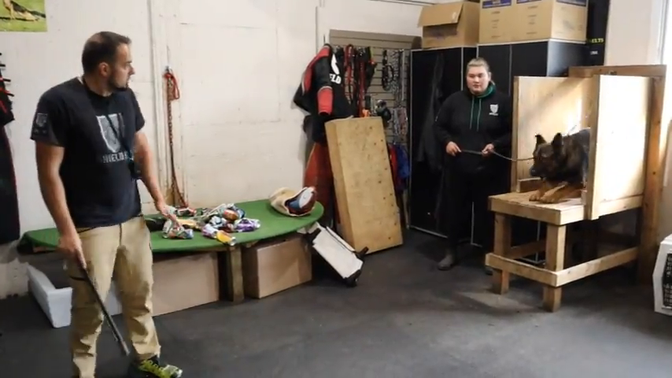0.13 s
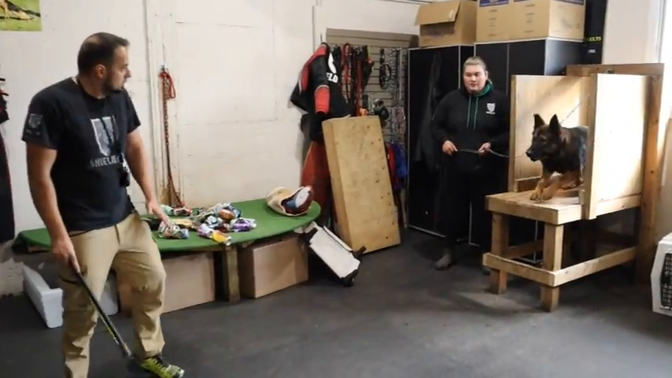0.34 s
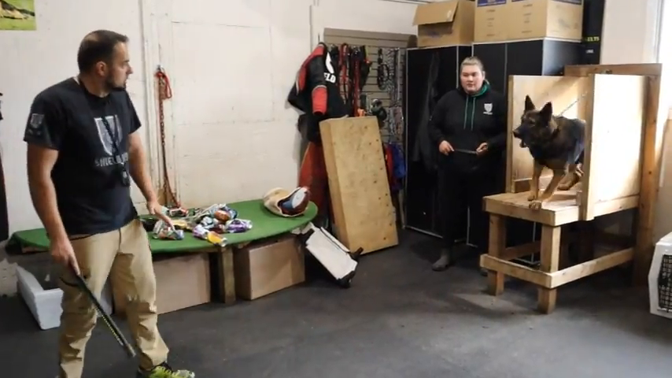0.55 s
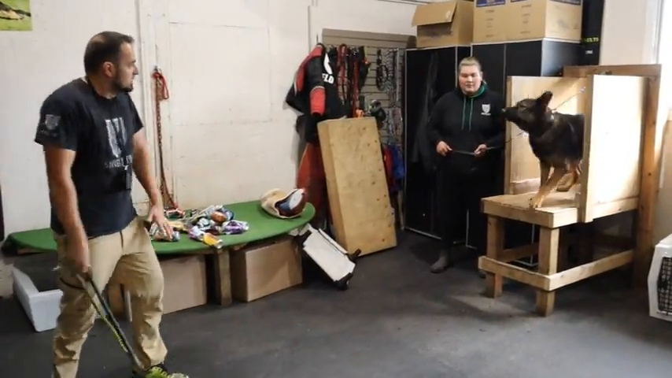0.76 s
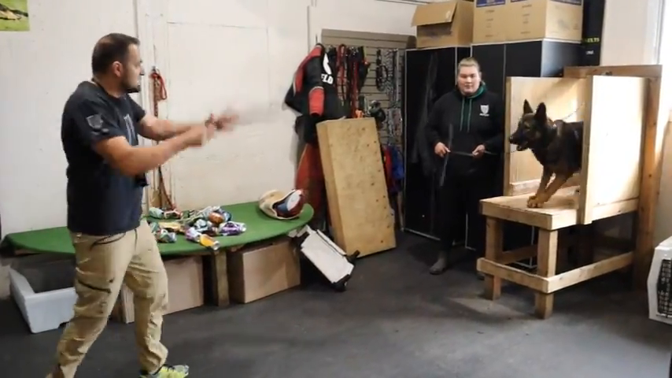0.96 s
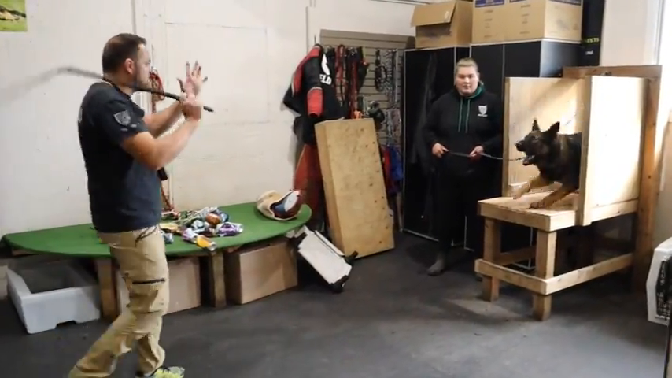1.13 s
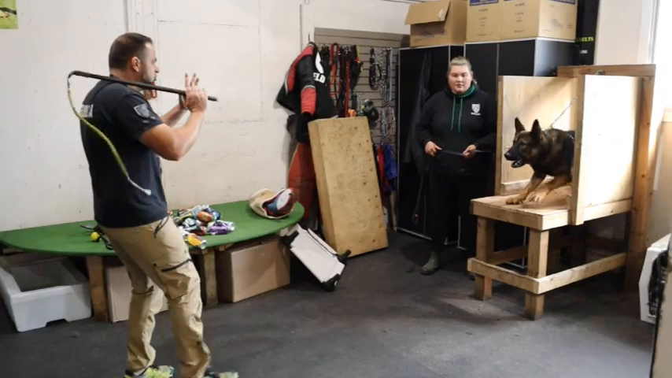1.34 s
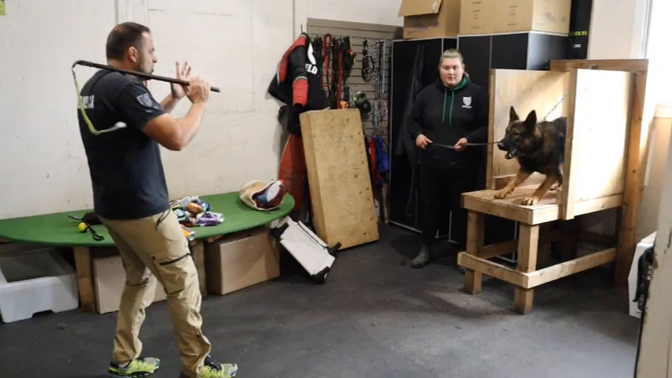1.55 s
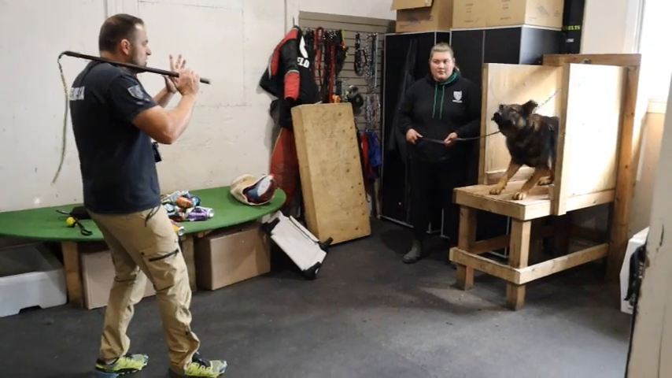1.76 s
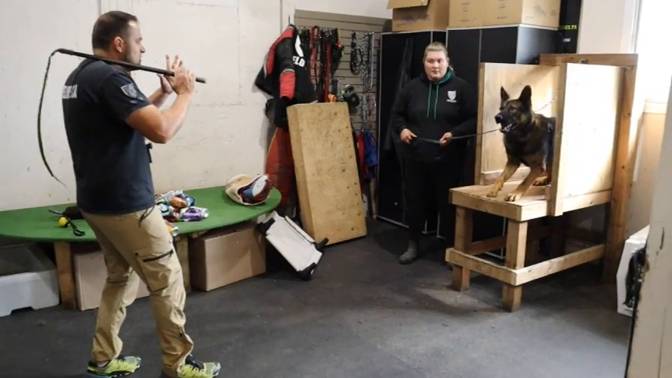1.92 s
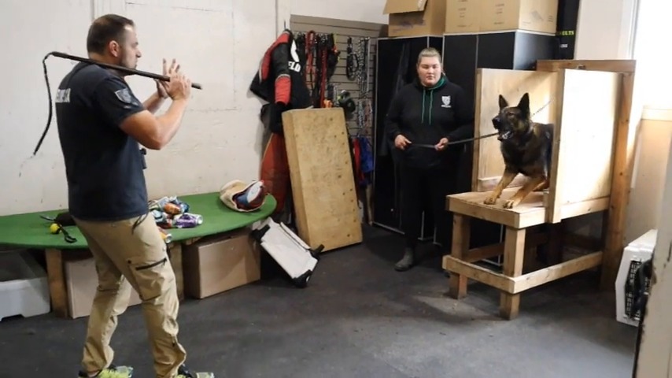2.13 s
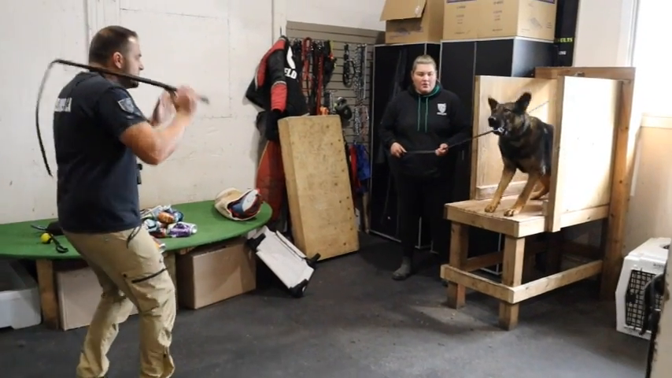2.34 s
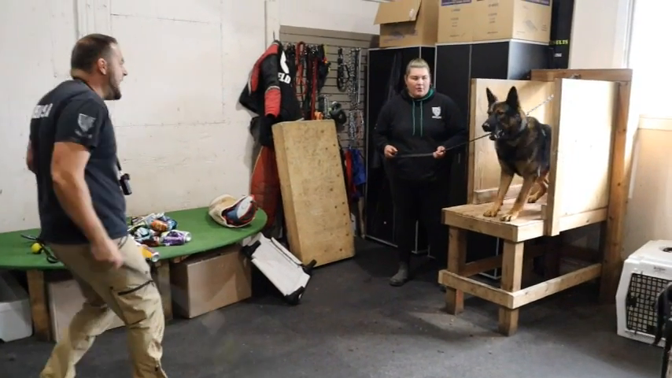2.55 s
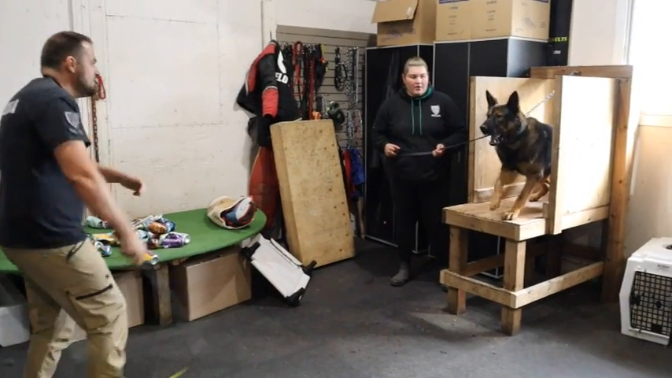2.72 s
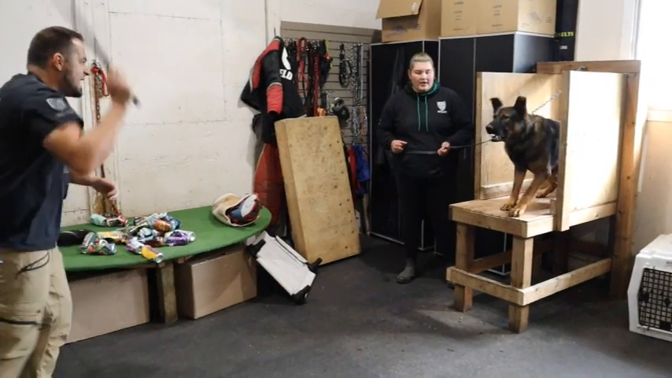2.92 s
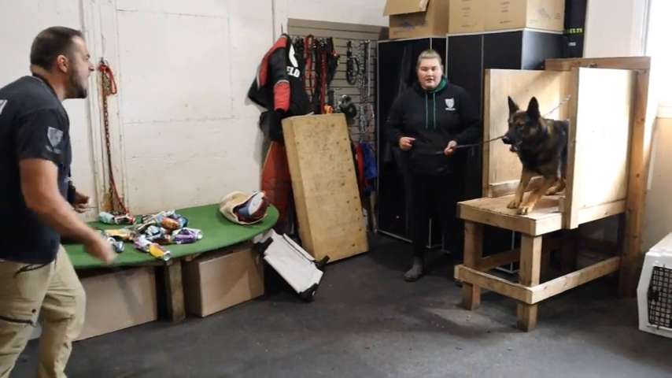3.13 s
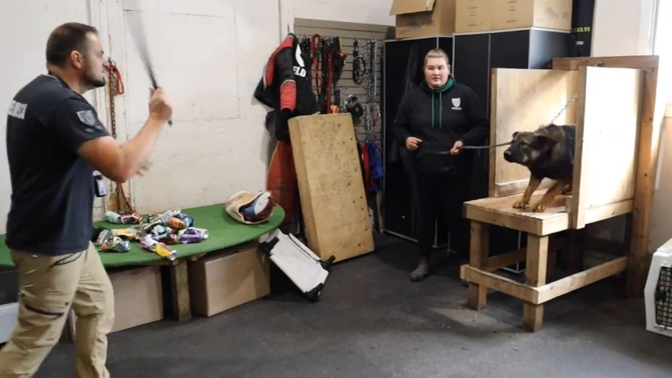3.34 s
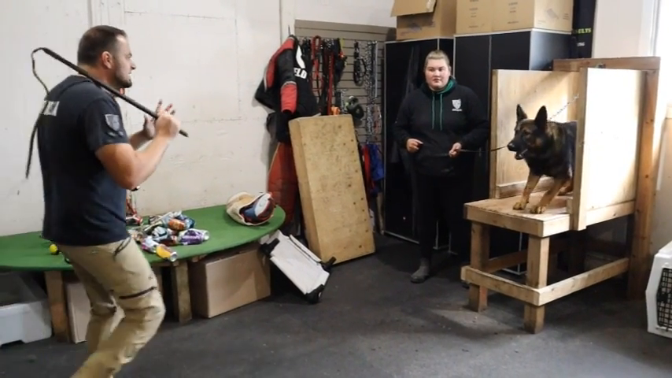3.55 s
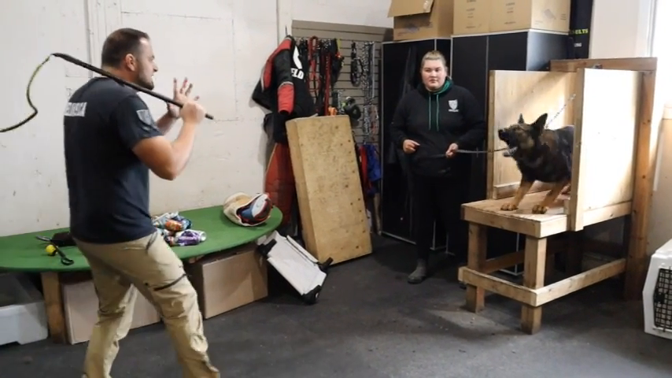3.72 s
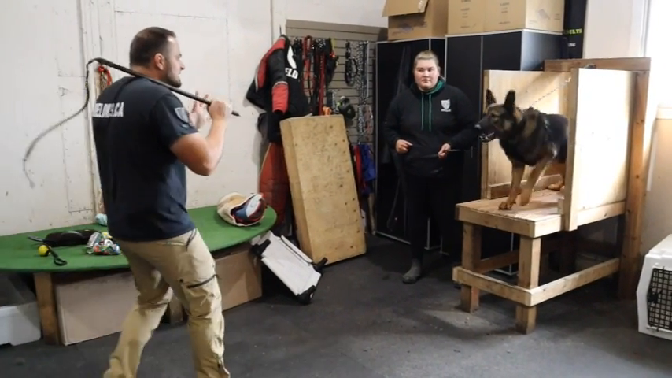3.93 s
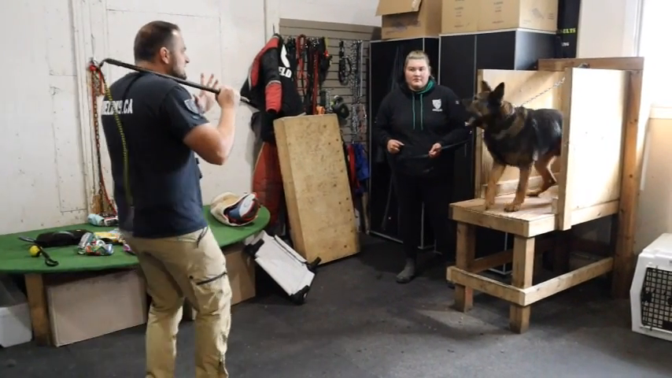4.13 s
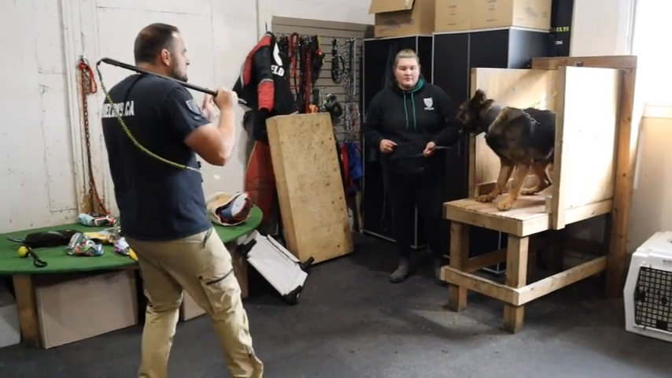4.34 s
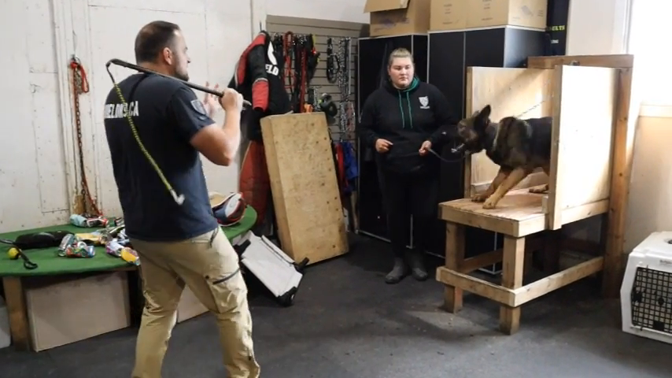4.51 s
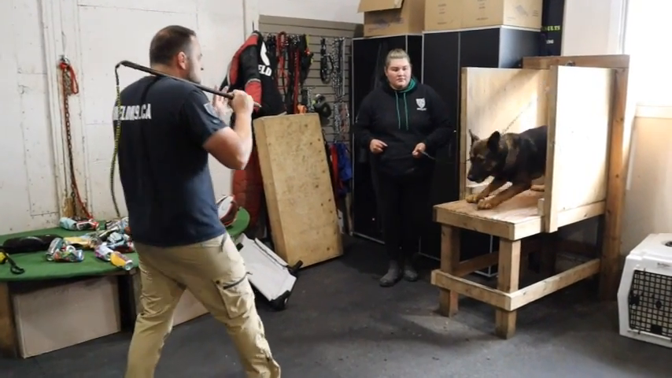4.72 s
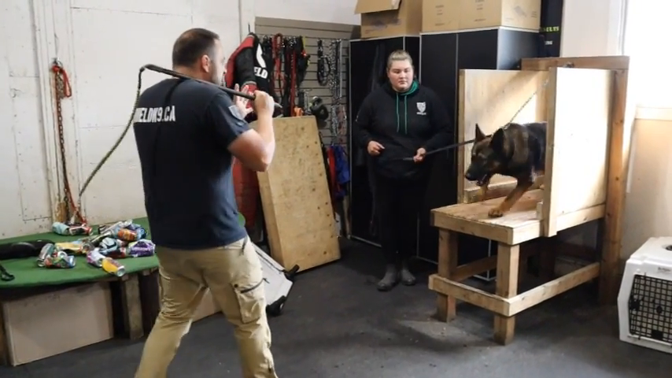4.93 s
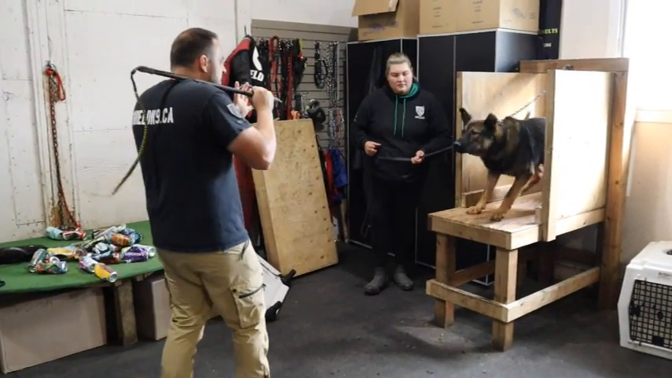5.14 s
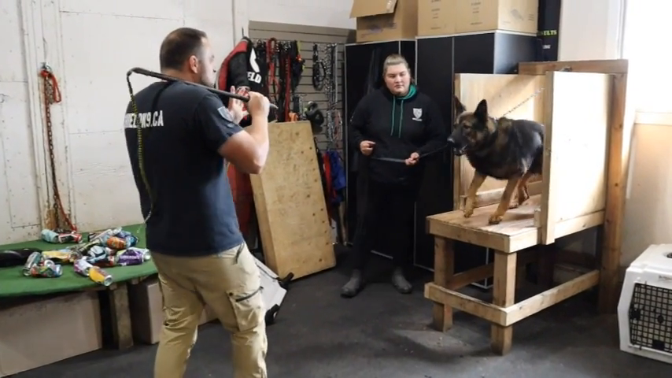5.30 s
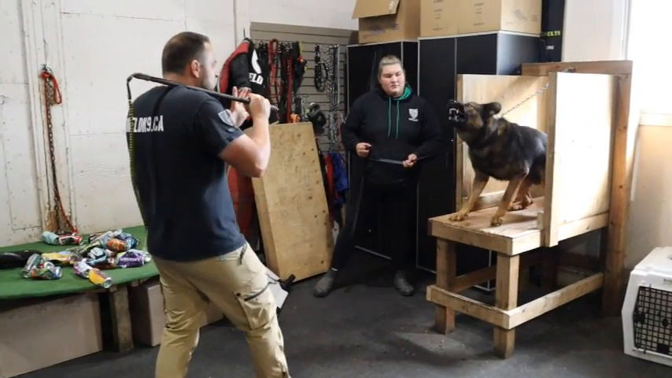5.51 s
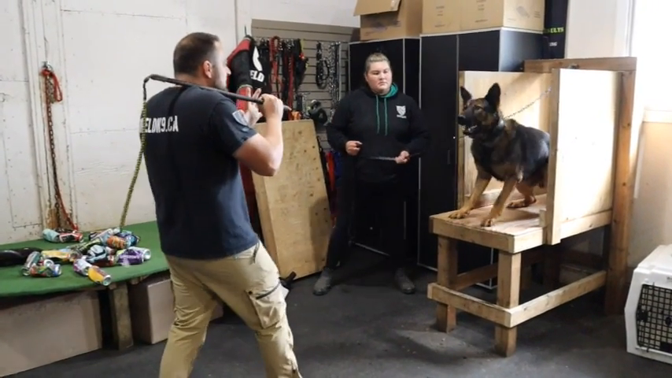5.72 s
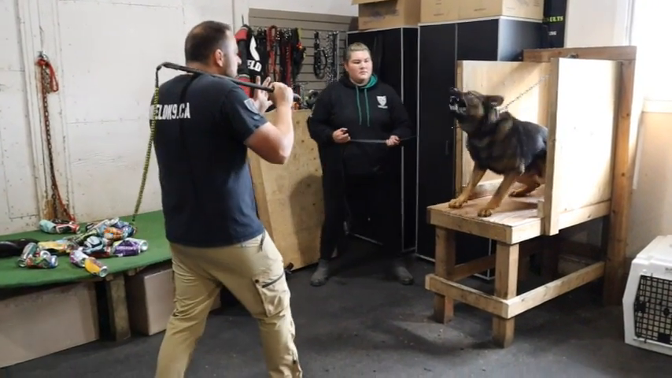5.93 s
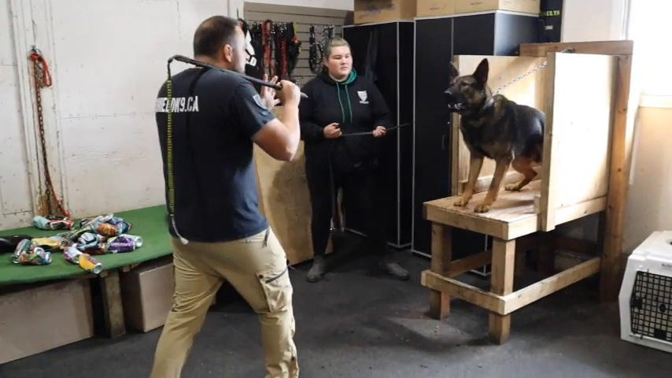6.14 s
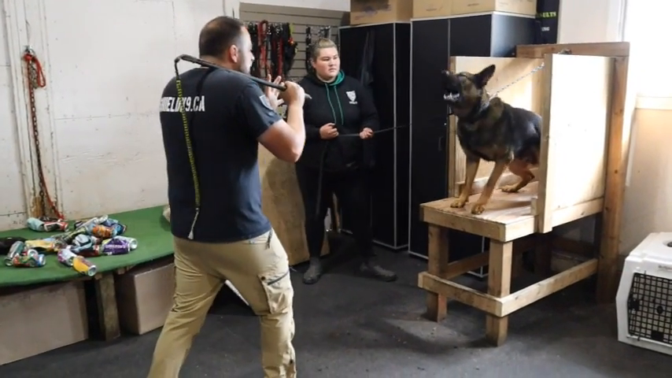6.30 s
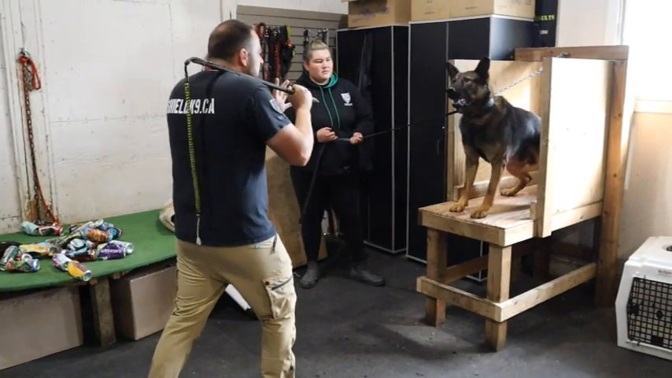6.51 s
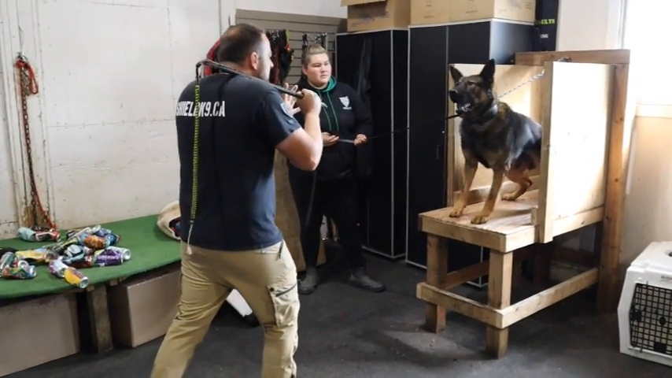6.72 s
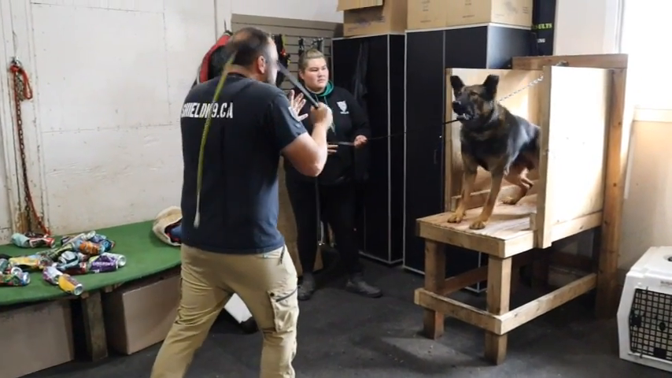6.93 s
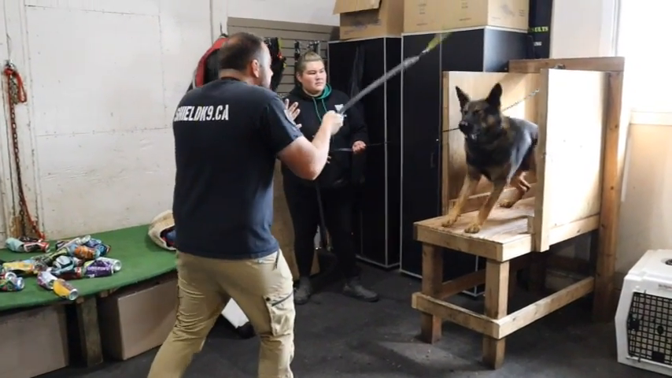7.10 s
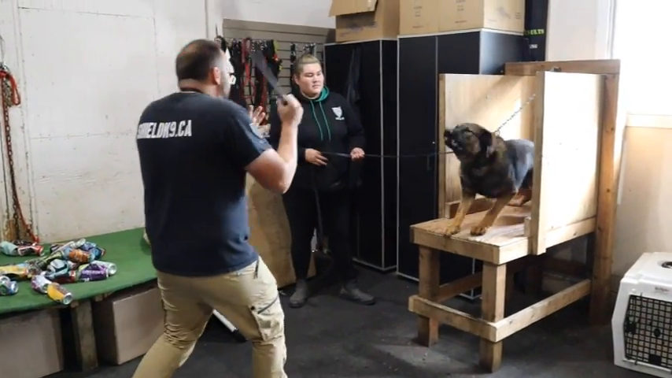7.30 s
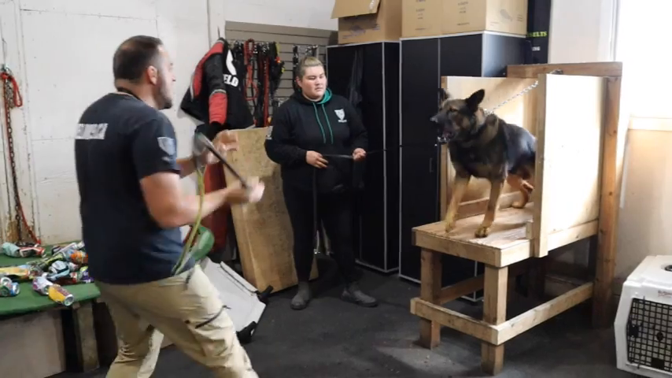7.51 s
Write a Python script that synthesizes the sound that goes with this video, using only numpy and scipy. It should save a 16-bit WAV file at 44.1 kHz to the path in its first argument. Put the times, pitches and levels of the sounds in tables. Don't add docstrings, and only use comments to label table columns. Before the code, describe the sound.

A large dog barks loudly about twice a second in a hard, echoing room, with fainter yelps and one sharp whip crack close by.

```python
import sys
import numpy as np
from scipy import signal
from scipy.fft import rfft, irfft
from scipy.io import wavfile
from scipy.ndimage import uniform_filter1d

SR = 44100
rng = np.random.default_rng(int(sys.argv[2]) if len(sys.argv) > 2 else 0)


def volts(x):
    e = np.asarray(x, float) / 20
    return 10 ** e


def dump(signal):
    limited = np.clip(np.atleast_2d(signal).T, -1, 1)
    pcm = np.round(limited * 32767).astype(np.int16)
    wavfile.write(sys.argv[1], SR, pcm)


N = 337806

# frequency_hz, level_db
BARK_THROAT = [(60, -75.5), (220, -26), (350, -19.5), (500, -9.5), (600, 3.5), (700, -2), (850, -3.5),
               (1020, 2), (1300, -9), (1550, -8.5), (2000, -18.5), (2400, -29), (4000, -54), (8000, -70)]
# frequency_hz, level_db
BREATH_SPECTRUM = [(1800, -37.5), (2600, 1), (4000, 0), (6500, -7), (9000, -20), (12000, -24), (15000, -41)]


def read(points, hz):
    f, value = np.transpose(points)
    return np.interp(np.log(hz + 1), np.log(f + 1), value)


def evened(x):
    return x / np.sqrt(np.mean(x ** 2) + 1e-20)


def colour(x, points):
    size = x.shape[-1]
    gain = volts(read(points, np.fft.rfftfreq(size, 1 / SR)))
    return irfft(rfft(x) * gain, size)


def hiss(size, points):
    return evened(colour(rng.standard_normal(size + 2048), points)[:size])


def wander(size, span):
    span = max(int(span), 2)
    smooth = uniform_filter1d(rng.standard_normal(size), span)
    return evened(uniform_filter1d(smooth, span))


def add(mix, s, sound):
    at = round(s * SR)
    sound = sound[max(-at, 0):]
    part = mix[max(at, 0):][:len(sound)]
    part += sound[:len(part)]


def balance(db):
    return volts(db * np.array([[.5], [-.5]]))


def ports(x, lag):
    return np.array([np.pad(x, (lag, 0))[:N], x])


def room(x, build):
    # frequency_hz, t60_s
    decay = [(100, 0.97), (400, 1), (1000, 1), (2000, 0.92), (4000, 0.47), (10000, 0.63)]
    # frequency_hz, level_db
    spread = [(30, -20), (125, -5), (300, -9), (600, -8), (1000, -3), (2000, 2), (4000, 4), (8000, 8),
              (13000, 4)]
    taps = rng.standard_normal((2, SR)) * (rng.random((2, SR)) < .5)
    hz, t, z = signal.stft(taps, SR, nperseg=256)
    fade = volts(-60 * t / read(decay, hz)[:, None])
    tail = signal.istft(z * fade, SR, nperseg=256)[1][:, :SR]
    tail = tail * (1 - np.exp(-(np.arange(SR) / SR / build) ** 2))
    tail = tail / np.linalg.norm(tail[0])
    mid, side = signal.fftconvolve(x[None], tail, axes=1)[:, :N]
    side = colour(side, spread)
    return np.array([mid + side, mid - side])


def hum():
    # frequency_hz, level_db
    ambience = [(30, -21), (120, -15.5), (300, 6), (1000, 3.5), (3000, -3), (8000, -18.5), (15000, -43.5)]
    return volts(-52.0) * np.array([hiss(N, ambience), hiss(N, ambience)])


def earlier_bark():
    size = SR // 2
    return volts(-18 - 70 * np.arange(size) / SR) * hiss(size, BARK_THROAT)


def swells(rows, spectrum):
    out = np.zeros(N)
    for s, length, db in rows:
        size = round(length * SR)
        level = volts(db + 2.5 * wander(size, 300)) * np.hanning(size)
        add(out, s, level * hiss(size, spectrum))
    return out


def scuffs():
    # start_s, scrape_db, length_s, thud_db
    contacts = [(0.13, -32, 0.033, -43.5), (0.36, -49, 0.02, -42), (0.413, -47, 0.011, -52),
                (0.904, -29.5, 0.041, -56.5), (1.029, -49, 0.021, -56), (1.142, -30, 0.08, -46),
                (1.36, -50, 0.02, -45), (1.48, -26.5, 0.04, -51.5), (1.599, -54, 0.02, -53.5),
                (1.99, -60, 0.02, -52), (2.53, -47, 0.034, -51.5), (2.62, -50, 0.03, -56),
                (2.696, -34, 0.02, -61.5), (3.708, -36.5, 0.032, -59.5), (4.204, -38, 0.04, -50),
                (4.744, -28, 0.051, -49), (4.884, -29, 0.034, -47.5), (4.982, -32, 0.071, -63),
                (6.212, -40, 0.059, -45.5), (5.85, -60, 0.02, -52), (7.578, -25.5, 0.17, -63)]
    # frequency_hz, level_db
    scrape_spectrum = [(300, -20.5), (1500, 6.5), (3000, 4), (6000, 0), (10000, -23.5), (14000, -24)]
    # frequency_hz, level_db
    thud_spectrum = [(25, -35.5), (70, -10.5), (120, 5), (180, 4), (260, 4.5), (400, -45.5)]
    # start_s, length_s, level_db
    gasps = [
        (2.56, .26, -41),
        (6.16, .16, -43),
        (6.67, .16, -46),
    ]
    # frequency_hz, level_db
    gasp_spectrum = [(100, -40), (300, -8), (1500, 0), (3000, 0), (4500, -4), (6000, -18), (12000, -40)]
    # start_s, length_s, level_db
    swishes = [
        (1.11, .1, -35),
        (7.15, .2, -40),
    ]
    out, t = np.zeros(N), np.arange(14000) / SR
    for s, db, length, thud_db in contacts:
        fade = volts(db - 26 * t / max(length, .003))
        add(out, s, fade * hiss(len(t), scrape_spectrum) * (1 - np.exp(-t / (.25 * length))))
        add(out, s, volts(thud_db - 140 * t) * hiss(len(t), thud_spectrum) * (1 - np.exp(-t / .0085)))
    return out + swells(gasps, gasp_spectrum) + swells(swishes, scrape_spectrum)


def whip():
    # start_s, level_db, sign, half_period_ms
    ticks = [
        (3.1375, -23, 1, .085),
        (3.1418, -24, -1, .045),
        (3.1445, -11, 1, .08),
        (3.1528, -9, -1, .05),
        (3.153, -13, -1, .35),
        (3.156, -11, 1, .085),
        (3.1745, -11, 1, .12),
        (3.204, -14, -1, .1),
    ]
    # frequency_hz, level_db
    echo_spectrum = [(60, -29), (200, -14.5), (500, -10.5), (1200, -2), (3000, -1.5), (6000, -4.5),
                     (9000, -18), (13000, -24.5), (15500, -34.5)]
    push_s, push_db, push_ms = 3.1447, .5, .57
    out, ms = np.zeros(N), np.arange(1500) / SR * 1000
    for s, db, sign, half in ticks:
        add(out, s, sign * volts(db) * np.cos(np.pi * ms / half) * np.exp(-ms / (2.9 * half)))
    u = ms / push_ms
    add(out, push_s, -volts(push_db) * np.sin(.63 * u) * np.exp(-.45 * u))
    shock = np.zeros(N)
    add(shock, push_s, np.ones(1))
    shock = evened(colour(shock, echo_spectrum)) / np.sqrt(N)
    return ports(out, 1) + volts(11) * balance(2.5) * room(shock, build=.014)


def voice(hz, rough, throat, jitter, shimmer_db):
    size, rough = len(hz), np.clip(rough, 0, 1)
    hz = hz * (1 + jitter * wander(size, 160))
    turns = np.cumsum(hz) / SR
    k = np.arange(1, 16)[:, None]
    lags = rng.random((15, 1))
    harmonics = volts(read(throat, k * hz)) * np.cos(2 * np.pi * (k * turns + lags))
    folds = evened(harmonics.sum(0)) * volts(shimmer_db * wander(size, 190))
    puffs = (.4 + np.exp(-(turns % 1) / .3)) * rng.standard_normal(size)
    return np.sqrt(1 - rough ** 2) * evened(folds) + rough * evened(colour(puffs, throat))


def glide(start, length, first_hz, last_hz, db):
    loudest = .5
    u = np.array([0, loudest, loudest + .25, 1])
    hz = first_hz + (last_hz - first_hz) * np.array([.015, .93, .95, .97])
    effort_db = db - 3.5 * np.array([.82, .013, .38, 1])
    return np.transpose([start + length * u, hz, effort_db])


def yelp(rows, rough, muffle_db, tract):
    s, hz, effort_db = np.transpose(rows)
    t = np.arange(s[0], s[-1], 1 / SR)
    throat = [(f, db - muffle_db * np.log2(f / 430)) for f, db in tract]
    sound = voice(np.interp(t, s, hz), rough, throat, jitter=.012, shimmer_db=3.)
    sound = sound + volts(-25.0 - muffle_db) * hiss(len(t), BREATH_SPECTRUM)
    return s[0], volts(np.interp(t, s, effort_db)) * sound * signal.windows.tukey(len(t), .3)


def second_dog():
    # time_s, pitch_hz, effort_db
    cry = [
        (.16, 269.3, -23.5),
        (.19, 326, -12.5),
        (.225, 415.3, -10.5),
        (.262, 475.6, -12.5),
        (.31, 430.3, -14.5),
        (.39, 337.3, -21),
    ]
    # start_s, length_s, first_hz, last_hz, effort_db
    yelps = [(.51, .17, 350.5, 426.2, -18.5), (2.52, 0.48, 380, 450, -27), (3.97, 0.1, 381, 380.5, -30.5),
             (4.43, 0.09, 457.5, 446.5, -31.5), (4.92, .1, 329.6, 299.3, -25),
             (6.15, 0.14, 419.7, 433, -26), (6.66, .15, 415.5, 444, -30), (7.52, .07, 393, 391.7, -23.5),
             (7.58, .2, 440, 490, -17)]
    # start_s, length_s, first_hz, last_hz, effort_db
    whines = [
        (.78, 0.098, 568, 554, -24.5),
        (4.21, 0.089, 414, 426, -27),
        (4.78, 0.13, 430.6, 467, -29),
        (5.24, 0.22, 441, 416, -37),
        (6.36, .14, 410, 421, -26.5),
    ]
    # frequency_hz, level_db
    cry_throat = [(60, -73), (300, -19), (480, -12), (620, 4.5), (950, -3), (1400, -7), (1800, -16),
                  (2300, -24.5), (2900, -40), (6000, -58.5)]
    # frequency_hz, level_db
    yelp_throat = [(60, -70), (250, -26), (430, -7), (650, -5), (900, 0), (1300, -8), (1750, -14),
                   (2200, -24), (2700, -42), (6000, -58)]
    out = np.zeros(N)
    add(out, *yelp(cry, rough=.36, muffle_db=0, tract=cry_throat))
    for row in yelps:
        add(out, *yelp(glide(*row), rough=.42, muffle_db=1.5, tract=yelp_throat))
    for row in whines:
        add(out, *yelp(glide(*row), rough=.35, muffle_db=8, tract=yelp_throat))
    return out


def bark(start, length, peak_db, high_hz, after):
    # frequency_hz, level_db
    opening = [(350, 0), (700, 0), (1050, -6.5), (1400, 1.5), (1750, 7.5), (2100, 6.5), (2600, -2.5)]
    # frequency_hz, level_db
    boards = [(20, -10.5), (60, -3.5), (120, 10.5), (200, 5), (300, -25.5)]
    # time_s, jolt_db (re effort)
    brace = [
        (0, -52.5),
        (1.2, -42),
        (2.2, -60.5),
        (2.8, -56),
        (3.3, -33),
        (3.8, -29),
        (5.3, -36),
        (7.3, -33.5),
    ]
    attack_s, peak_s, release_s, low_hz = .038, .091, .053, 343
    t = np.arange(0, length, 1 / SR)
    times = [0, attack_s, peak_s, max(length - release_s, peak_s), length]
    effort_db = peak_db + np.interp(t, times, [-22.5, -4, 0, -5.5, -17])
    tilt_db = .5 * (peak_db + 9)
    throat = [(f, db + tilt_db * np.log2(f / 1000)) for f, db in BARK_THROAT]

    wide = (1 + np.tanh((t - after) / .011)) / 2
    hz = low_hz + (high_hz - low_hz) * wide
    hz = hz * (1 - .05 * np.exp((t - length) / .03))
    arch = np.sin(np.pi * np.clip((t - after) / (length - after), 0, 1))
    hz = hz * (1 + .025 * wide * (arch - .8))

    sound = voice(hz, rough=.5, throat=throat, jitter=.02, shimmer_db=3.)
    sound = wide * sound + (1 - wide) * colour(sound, opening)
    rasp_db = -25.5 - .5 * (2.5 - wide) + 1.9 * wander(len(t), 110)
    rasp = volts(rasp_db) * hiss(len(t), BREATH_SPECTRUM)
    shape = volts(effort_db) * signal.windows.tukey(len(t), .2)
    jolt_db = np.interp(start, *np.transpose(brace)) + 120 * (t - peak_s)
    return start, shape * (sound + rasp), shape * volts(jolt_db) * hiss(len(t), boards)


def barking_dog():
    # start_s, length_s, effort_db, high_register_hz, break_after_s
    barks = [(-.085, 0.2, -11.5, 455.2, .05), (.685, 0.15, -8.5, 494.4, 0.043),
             (1.178, .175, -9.5, 515, 0.053), (1.7, .155, -9.5, 510.2, 0.074),
             (2.243, 0.153, -8.5, 506.5, 0.058), (2.77, 0.18, -10, 506.7, .08),
             (3.285, 0.16, -10.5, 488.6, 0.058), (3.75, 0.17, -10.5, 514.4, 0.068),
             (4.225, 0.15, -13.5, 449.2, 0.061), (4.53, 0.16, -11, 500.6, 0.059),
             (5.026, 0.1596, -7.5, 520.5, .06), (5.493, .155, -9, 509.6, 0.052),
             (5.927, .15, -7.5, 548.7, .064), (6.32, 0.17, -9.5, 529.5, 0.066),
             (6.81, .15, -7.5, 540, 0.062), (7.263, .165, -8.3, 529.3, .054)]
    near, other, stand = np.zeros((3, N))
    for k, row in enumerate(barks):
        s, sound, jolt = bark(*row)
        add((near, other)[k % 2], s, sound)
        add(stand, s, jolt)
    return near, other, stand


def scene():
    # time_s, left_over_right_db
    turn = [
        (0, -1),
        (2.8, -1.5),
        (3.3, 2),
        (4.8, 0),
        (5.2, 0),
        (7.6, -1.5),
    ]
    claws, far = scuffs(), second_dog()
    near, other, stand = barking_dog()
    direct = ports(volts(-1.2) * (near + other + far) + claws, 4)
    direct = direct + stand * volts(np.array([[-3], [3]]))
    wet = room(near + claws + stand / 2, .01) + room(other, .01) + room(far, .012)
    before = np.zeros(N)
    add(before, 0, earlier_bark())
    turn_db = np.interp(np.arange(N) / SR, *np.transpose(turn))
    return balance(turn_db) * (direct + volts(-5.5) * wet) + whip() + before + hum()


def band_limit(x):
    return signal.sosfilt(signal.butter(12, 14900, fs=SR, output="sos"), x)


def record(dry):
    low_cut_hz, ceiling = 28, 1.4
    low_cut = signal.butter(N=2, Wn=2 * low_cut_hz / SR, btype='high')
    dry = signal.lfilter(*low_cut, dry) * balance(.6)
    power_db = 10 * np.log10(abs(uniform_filter1d((dry ** 2).mean(0), 200)) + 1e-12)
    fall = np.arange(N) * 170.0 / SR
    over_db = np.maximum(np.maximum.accumulate(power_db + fall) - fall - 10.5, 0)
    held = dry / volts(.13 * uniform_filter1d(over_db, 100))
    return band_limit(ceiling * np.tanh(held / ceiling))


dry = scene()
out = record(dry)
dump(out)
```